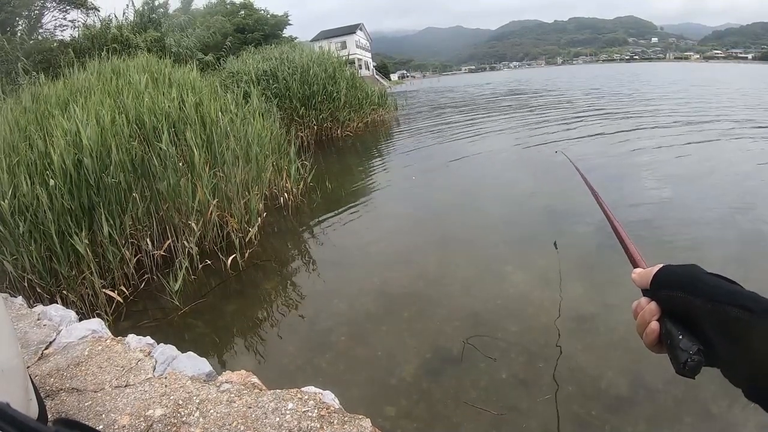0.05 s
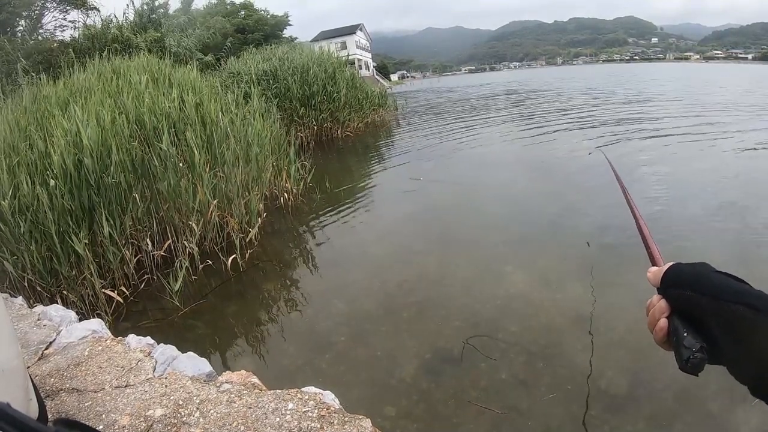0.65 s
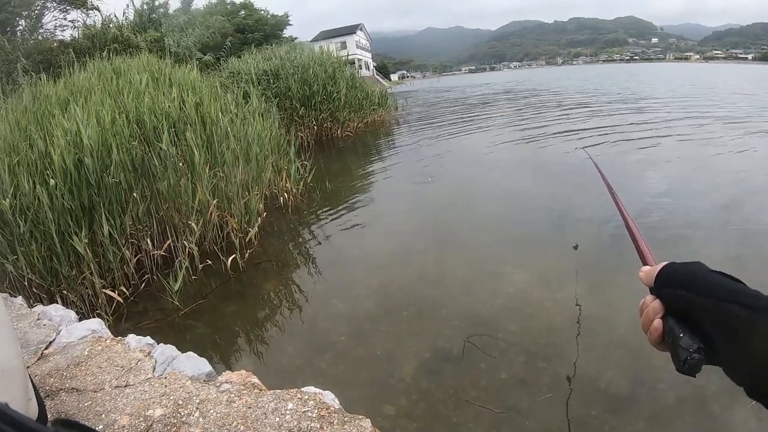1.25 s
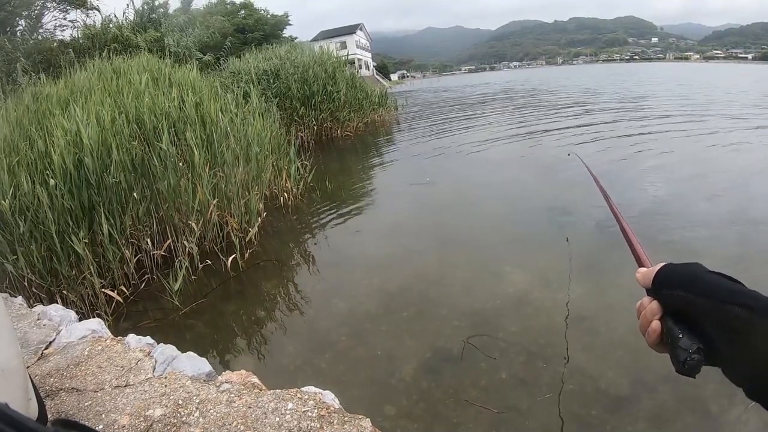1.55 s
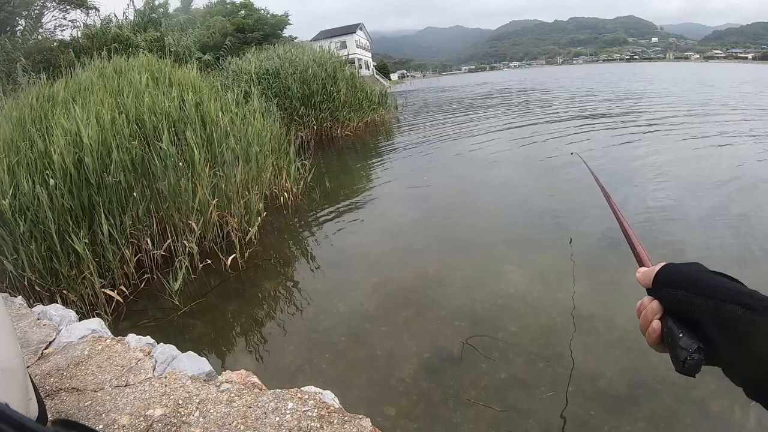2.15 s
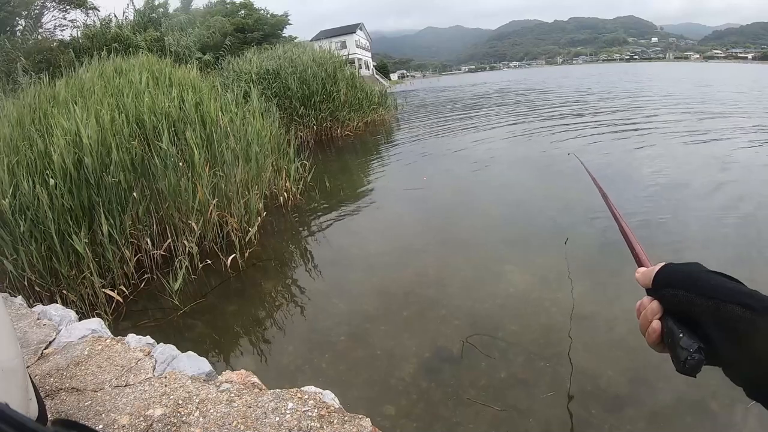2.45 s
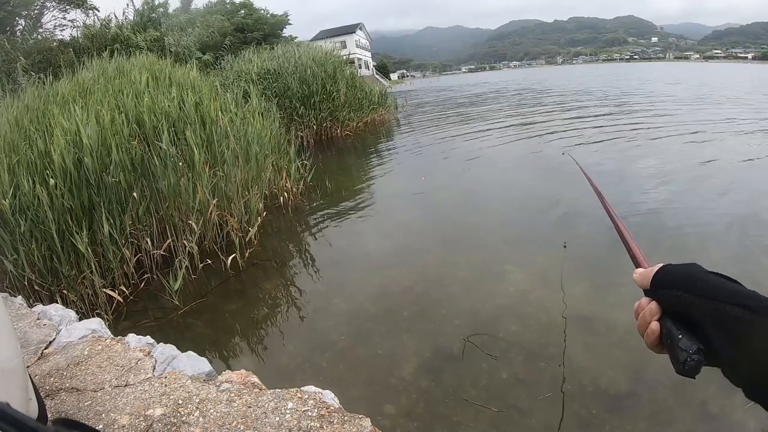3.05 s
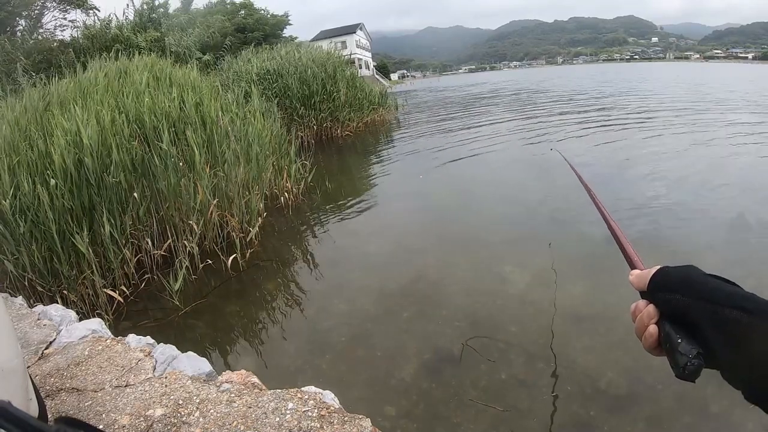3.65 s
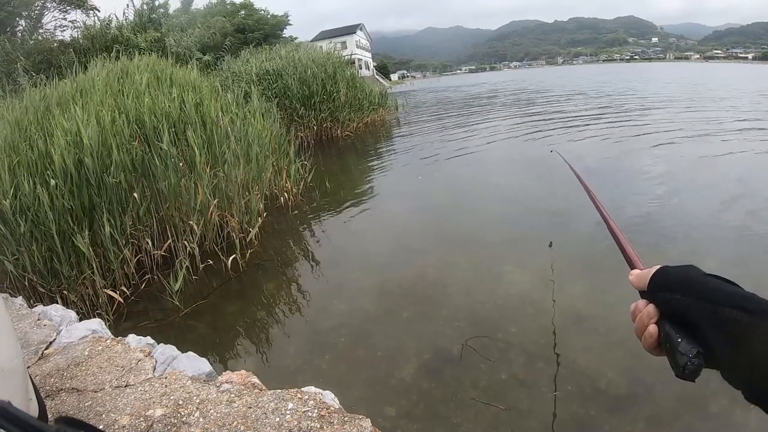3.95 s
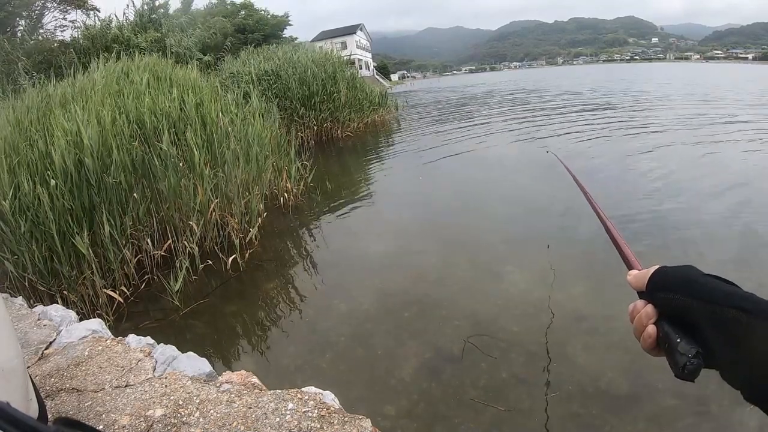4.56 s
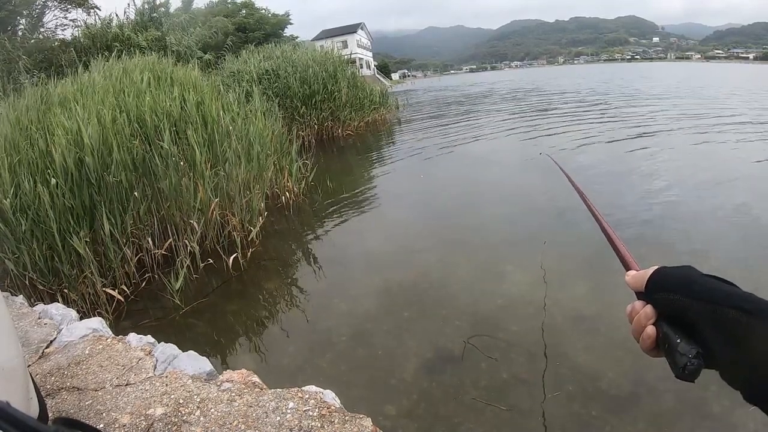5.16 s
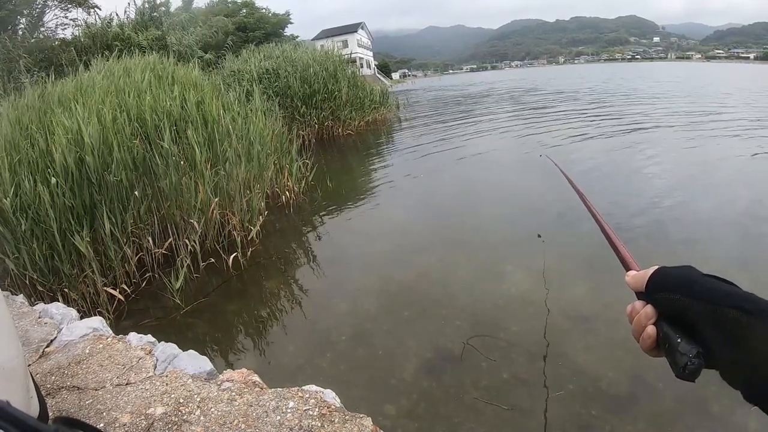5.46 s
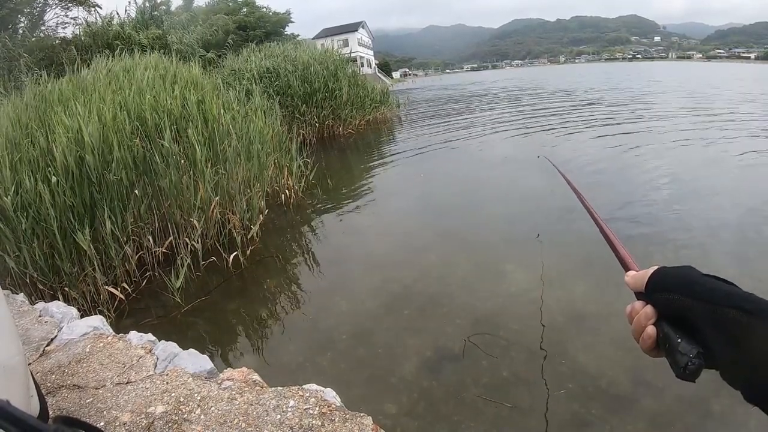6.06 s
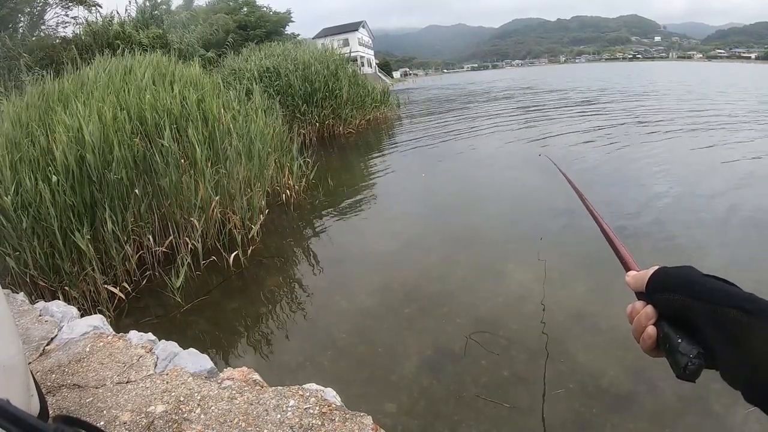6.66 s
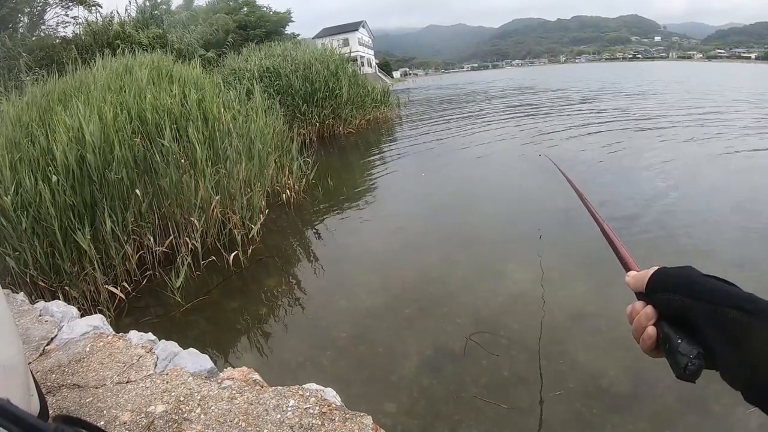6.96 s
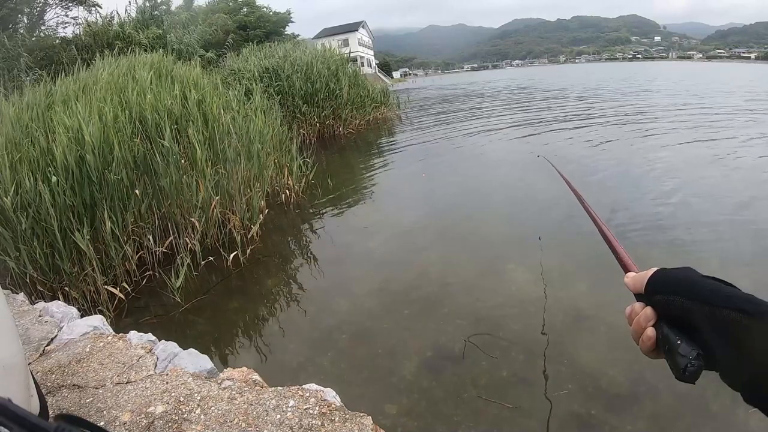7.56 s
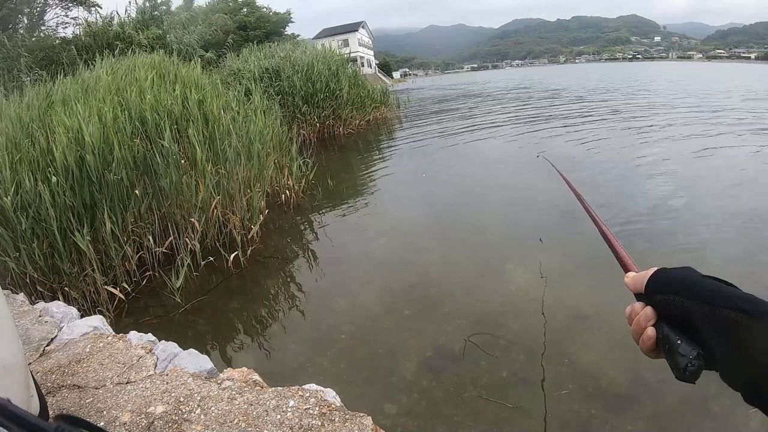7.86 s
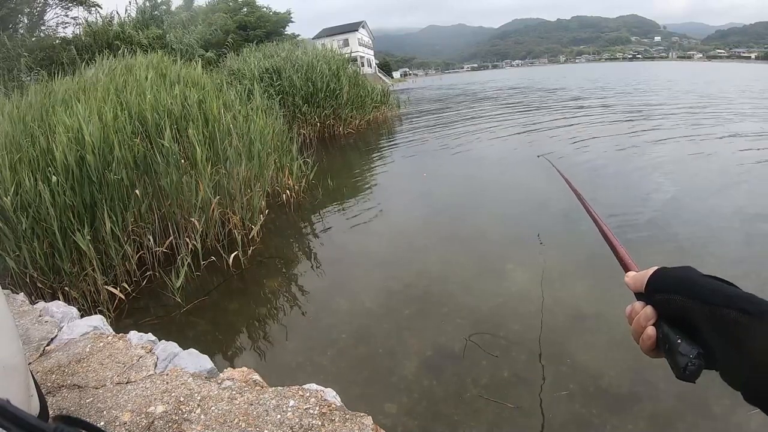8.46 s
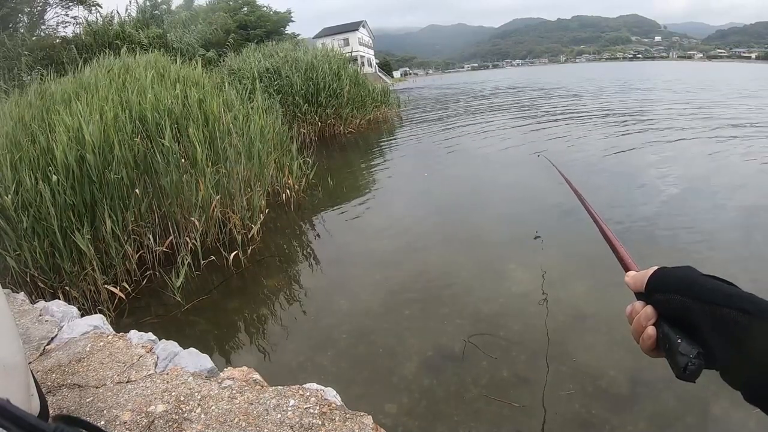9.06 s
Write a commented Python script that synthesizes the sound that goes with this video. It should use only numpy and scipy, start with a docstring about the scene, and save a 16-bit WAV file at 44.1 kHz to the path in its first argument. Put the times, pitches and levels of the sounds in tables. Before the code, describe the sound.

A distant engine drones across a lake with a low, wavering hum and a dull roar. It swells about three seconds in, sinks a little in pitch, then slowly fades. A breeze hisses evenly in the reeds, with faint rustles and ticks from the stalks. In the second half, small drips plop at the water's edge, and light gusts buffet the body-worn microphone near the end.

```python
"""A distant engine drones across a lake, its firing hum wavering over the water inside a dull roar.
A breeze hisses in the reeds; a thin machine whine and a faint insect buzz die away early, while
leaves brush and stalks tick. Near 3 s the engine swells with a hollow growl, sinking a little in pitch,
then slowly fades. From about 5.7 s clear drips plop at the water's edge, each a ringing bubble.
Light gusts, barely there at first, buffet the two ports of a body-worn camera near the end."""
import sys
import numpy as np
from scipy import signal
from scipy.fft import rfft, irfft, next_fast_len
from scipy.io import wavfile
from scipy.ndimage import uniform_filter1d

SR = 44100
rng = np.random.default_rng(int(sys.argv[2]) if len(sys.argv) > 2 else 0)


def file_out(sig):
    """Save sig as 16-bit WAV at sys.argv[1]."""
    # one column per channel
    cols = np.atleast_2d(sig).T
    # limit, then scale
    lim = np.clip(cols, -1, 1)
    pcm = np.round(lim * 32767).astype(np.int16)
    wavfile.write(sys.argv[1], SR, pcm)


N = 410571
TIME = np.arange(N) / SR

# how well the engine's drone, roar and whirr reach the shore: (time [s], relative level [dB])
PASSAGE = [(0.05, -43.5), (.4, -44), (1.2, -44), (1.6, -44), (2.1, -43.5), (2.66, -40), (2.98, -46.5),
           (3.38, -44.5), (3.65, -47), (5.25, -49), (6.3, -56), (7.33, -60), (9.25, -65)]


def gain_of(db):
    """Decibels to amplitude."""
    return 10 ** (np.asarray(db) / 20)


def unit_rms(x):
    """Scales to rms 1."""
    return x / np.sqrt(np.mean(x ** 2) + 1e-20)


def curve(rows, axis=1):
    """Joins one column of (time, value, ..) rows by straight lines."""
    columns = np.transpose(rows)
    return np.interp(TIME, columns[0], columns[axis])


def below_peak(rows):
    """A level curve in dB, with its loudest moment at 0."""
    level_db = curve(rows)
    return level_db - level_db.max()


def at_hz(rows, hz, axis=1):
    """Reads one column of a table on a log-frequency axis."""
    columns = np.transpose(rows)
    return np.interp(np.log(hz + 1), np.log(columns[0] + 1), columns[axis])


def wander(rate_hz):
    """Random drift of rms 1, with little motion faster than the rate."""
    size = next_fast_len(N)
    hz = np.fft.rfftfreq(size, 1 / SR)
    spectrum = rfft(rng.standard_normal(size)) * np.exp(-.5 * (hz / rate_hz) ** 2)
    return unit_rms(irfft(spectrum, size)[:N])


def swell(s, length):
    """A smooth rise and fall around a moment."""
    return np.cos(np.pi * np.clip((TIME - s) / length, -.5, .5)) ** 2


def surges(rows):
    """Passing lifts and dips in level, in dB."""
    return sum(lift_db * swell(s, length) for s, length, lift_db in rows)


def add(mix, s, sound):
    """Mixes a two-channel sound in at a moment."""
    part = mix[:, max(round(s * SR), 0):][:, :sound.shape[1]]
    part += sound[:, :part.shape[1]]


def noise(colour, patchy_db, flicker_db):
    """Coloured noise with drifting patches and quick flicker, as the two ports pick it up."""
    # the port pair: (frequency [Hz], coherence, left phase lead [rad], left minus right [dB])
    ports = [(130, 0.96, 0.059, -0.7), (354, 0.97, 0.081, -1.6), (630, 1, 1.1, -1.5), (709, 0.87, 1.27, -2),
             (874, 0.89, 3.35, 1), (1160, 0.75, 6.63, 1), (1480, 0.76, 7.65, 5.5), (1830, 0.074, 5.9, 10.5),
             (2270, 0.22, 5.4, 4.5), (3040, 0.69, 5.93, -1), (3330, 1, 6.5, 0.7), (5600, 0.17, 8.3, -1.5),
             (7840, 0.43, 9.1, -2.5), (8800, 0.14, 9.4, -1.5)]
    frames, hz = N // 512 + 5, np.fft.rfftfreq(2048, 1 / SR)
    a, b, c, d, patches = rng.standard_normal((5, frames, 1025))
    patches = uniform_filter1d(patches, size=7, axis=0)
    patches = unit_rms(uniform_filter1d(patches, size=24, axis=1))
    coherence = np.clip(at_hz(ports, hz), 0, 1)
    left = a + 1j * b
    right = coherence * left + np.sqrt(1 - coherence ** 2) * (c + 1j * d)
    right *= np.exp(-1j * at_hz(ports, hz, axis=2))
    lean = gain_of(at_hz(ports, hz, axis=3))
    spectra = np.array([left * lean, right]) / np.sqrt(1 + lean ** 2)
    spectra *= gain_of(at_hz(colour, hz) + patchy_db * patches)
    sound = signal.istft(np.swapaxes(spectra, 1, 2), nperseg=2048, noverlap=1536)[1][:, :N]
    return unit_rms(sound * gain_of(flicker_db * wander(44)))


def from_bearing(sound, lift_db):
    """The camera body favours one port near 850 Hz, by an amount that depends on direction."""
    band = signal.sosfiltfilt(signal.butter(1, [730, 1000], "band", fs=SR, output="sos"), sound)
    return sound + band * (gain_of(lift_db * np.array([[1], [-.5]])) - 1)


def partial(turns, rough, width_hz):
    """A direct tone plus scattered paths that blur its level and phase."""
    scatter = (wander(width_hz) + 1j * wander(width_hz)) / np.sqrt(2)
    paths = np.sqrt(1 - rough ** 2) + rough * scatter
    return np.sqrt(2) * (paths * np.exp(2j * np.pi * turns)).real


def burst(low_hz, high_hz, decay_s, order):
    """A brief puff of noise in a band, nearly alike at both ports."""
    t = np.arange(SR // 8) / SR
    hiss = rng.standard_normal(len(t)) + .5 * rng.standard_normal((2, len(t)))
    band = signal.butter(order, [low_hz, high_hz], "band", fs=SR, output="sos")
    return unit_rms(signal.sosfilt(band, hiss)) * np.exp(-t / decay_s) * (1 - np.exp(-t / 0.0017))


def engine_tones(hum_trim_db=-0.9, waver_db=0.85, drone_order=2.185):
    """A wavering firing hum, a throb an octave below and a higher drone all ride one engine speed."""
    # the engine's firing: (time [s], rate [Hz])
    firing_rate = [(0, 133.3), (.6, 130), (1.05, 127.6), (2, 125.9), (2.6, 124.5), (2.9, 122), (3.3, 122.8),
                   (3.8, 120.4), (4.7, 120), (5.1, 119.6), (5.7, 121.6), (8.7, 122.1), (9.31, 124.7)]
    # the firing tone as it arrives over the water: (time [s], relative level [dB])
    hum_levels = [(0.0, -66), (0.3, -47), (0.48, -41.5), (0.78, -43), (0.88, -35.5), (0.96, -45),
                  (1.04, -36), (1.3, -35), (1.45, -39.5), (1.68, -33.5), (2.25, -31.5), (2.33, -37.5),
                  (2.52, -32), (3.06, -36), (3.28, -27.5), (3.52, -31), (3.77, -39.5), (3.9, -31.5),
                  (4.76, -35.5), (4.95, -47.5), (5.48, -43), (5.6, -32.5), (5.72, -34), (5.81, -52.5),
                  (5.9, -38.5), (6.03, -32), (6.36, -38.5), (6.46, -36.5), (6.65, -39.5), (6.88, -39.5),
                  (7.1, -34), (7.31, -39.5), (7.43, -36.5), (7.66, -33.5), (7.89, -47.5), (8.02, -34),
                  (8.3, -37), (8.56, -42), (8.76, -70), (8.92, -63), (9.02, -45), (9.3, -49.5)]
    # the half order, from uneven firing: (time [s], level [dB])
    throb_levels = [(0, -66), (.3, -43.5), (.58, -37.5), (.76, -48), (1.35, -41.5), (1.7, -50.5),
                    (2.2, -46.5), (3.2, -49), (4.2, -45.5), (5.1, -52), (5.8, -44), (6.4, -48.5),
                    (7.6, -50), (8.4, -61), (9.3, -72)]
    # moments when the drone carries better or worse: (time [s], length [s], lift [dB])
    drone_surges = [(.05, 0.63, -11.5), (0.775, 0.28, 9.5), (1.37, 0.16, 9), (1.827, 0.18, 8),
                    (2.25, 0.22, 4), (3.3, 0.55, 3), (5.377, 0.46, 5.5), (6.097, .35, 6), (6.62, .3, 5),
                    (8.023, 0.55, 15)]
    turns = np.cumsum(curve(firing_rate)) / SR
    hum_db = curve(hum_levels) + hum_trim_db + waver_db * wander(rate_hz=3.3)
    drone_db = -42 + 0.95 * below_peak(PASSAGE) + surges(drone_surges)
    hum = gain_of(hum_db) * partial(turns, rough=0.19, width_hz=16)
    throb = gain_of(curve(throb_levels)) * partial(turns / 2, rough=0.75, width_hz=8.2)
    drone = gain_of(drone_db) * partial(drone_order * turns, rough=0.79, width_hz=13.8)
    return hum + throb + drone


def whine():
    """A thin machine whine that arches in pitch and fades early."""
    # the whine's arch: (time [s], pitch [Hz], level [dB])
    arch = [(0, 572, -63), (.25, 568, -55), (.7, 588, -52), (.95, 578, -50), (1.35, 568, -54.5),
            (1.65, 565, -70), (2.2, 560, -100)]
    turns = np.cumsum(curve(arch)) / SR
    return gain_of(curve(arch, axis=2)) * partial(turns, rough=0.83, width_hz=19)


def roar():
    """The engine's dull, rough noise, sinking as it leaves."""
    # the roar's colour: (frequency [Hz], relative level [dB])
    colour = [(30, -25.5), (95, 0.5), (150, 0.5), (230, -6.5), (295, -1.5), (350, -10.5), (460, -13.5),
              (590, -8), (900, -16.5), (1250, -21.5), (2200, -25.5), (4000, -37.5), (8000, -57.5),
              (14000, -79.5)]
    # moments when the roar carries better: (time [s], length [s], lift [dB])
    roar_surges = [(3.3, 0.82, 3), (5.7, 0.53, 2), (6.22, .6, 3.5)]
    level_db = -38.5 + 0.95 * below_peak(PASSAGE) + surges(roar_surges)
    return gain_of(level_db) * noise(colour, patchy_db=1.5, flicker_db=-0.33)


def whirr(abeam_s=4.1, rise_db_per_s=1, fall_db_per_s=0.5):
    """A nasal whirr, beamed sideways as the engine passes."""
    # one nasal peak: (frequency [Hz], relative level [dB])
    colour = [(300, -52), (850, -11.5), (1060, 3), (1250, 1.5), (1500, -13.5), (2500, -21.5), (8000, -63.5)]
    beam_db = np.minimum(rise_db_per_s * (TIME - abeam_s), fall_db_per_s * (abeam_s - TIME))
    level_db = -52.5 + 0.67 * below_peak(PASSAGE) + beam_db
    return gain_of(level_db) * noise(colour, patchy_db=2.0, flicker_db=1.5)


def shore():
    """An even wash whose treble brightens as the breeze freshens."""
    # breeze in the reeds over the shore's far rumble: (frequency [Hz], relative level [dB])
    colour = [(20, -16), (48, -1), (90, 0.5), (180, -3.5), (310, -6), (450, -20), (740, -18), (900, -23.5),
              (1500, -19), (2400, -26), (3500, -29.5), (5000, -38.5), (8400, -53.5), (10200, -52.5),
              (13500, -70.5)]
    # the breeze's strength: (time [s], treble lift [dB])
    breeze = [(0, -1.5), (1.6, 1), (3.6, 2), (5, -1.5), (6.9, 0.5), (7.4, 2.2), (9.31, 1.5)]
    wash = gain_of(-43.0) * from_bearing(noise(colour, patchy_db=1.0, flicker_db=.5), lift_db=-1.0)
    treble = signal.sosfiltfilt(signal.butter(2, 5000, "high", fs=SR, output="sos"), wash)
    return wash + treble * (gain_of(curve(breeze)) - 1)


def insect(pitch_hz=6330):
    """A faint, grainy, thin buzz from the reeds that soon stops."""
    buzz = partial(pitch_hz * TIME, rough=1, width_hz=150) * gain_of(3 * wander(40))
    level_db = curve([(0, -89), (.36, -80), (.46, -100), (.7, -140)])
    return gain_of(level_db) * buzz * gain_of([[1.5], [-1.5]])


def rustles(rise_s=0.028, fall_s=0.068, lift_db=7.5):
    """Leaf strokes leaf: a hiss swells and trails off, and dry edges add a bright scrape."""
    # reeds brushing each other: (time [s], relative level [dB], scrape lift [dB])
    strokes = [(.3, -65.5, -20), (.46, -65.5, -14), (.985, -73, 7), (1.345, -64, -2), (1.412, -63.5, 2),
               (1.68, -66, -9), (2.01, -63.5, -1), (2.65, -68.5, 3), (2.97, -71, 6), (3.39, -69, -9),
               (3.62, -68, -6), (3.86, -70, -1), (4.69, -69, 0)]
    # the leaves' hiss: (frequency [Hz], relative level [dB])
    colour = [(500, -23.5), (2300, 6.5), (3700, 2), (6000, -14), (10300, -19), (11500, -25), (14000, -34)]
    hiss = noise(colour, patchy_db=1.5, flicker_db=1.0)
    hiss = unit_rms(hiss * gain_of(2.5 * wander(300)))  # grainy as the edges slip
    scrape = signal.sosfiltfilt(signal.butter(3, 5500, "high", fs=SR, output="sos"), hiss)
    out = np.zeros((2, N))
    for s, db, scrape_db in strokes:
        from_peak = np.maximum((s - TIME) / rise_s, (TIME - s) / fall_s)
        envelope = np.exp(-np.minimum(from_peak, 10) ** 2)
        out += gain_of(db + lift_db) * envelope * (hiss + (gain_of(scrape_db) - 1) * scrape)
    return out


def ticks(faint_count=170, snap_s=.567, snap_hz=11000):
    """Reed stalks tick, each a narrow resonance plus a broader crack; one tiny snap is far brighter."""
    # the clearest stalk ticks: (time [s], relative level [dB], pitch [Hz])
    clear = [(3.40, -56, 3940), (3.61, -50.5, 3600), (4.929, -50, 3470), (5.558, -50.5, 3060),
             (5.657, -55.5, 3600), (6.85, -54, 3400), (7.088, -58, 3583), (7.593, -53, 3300),
             (8.042, -56, 3120), (8.155, -59, 3200), (8.245, -59, 3500), (8.43, -52, 3300),
             (8.585, -59, 3550), (8.877, -56, 3360)]
    faint = [(when * N / SR, -65 + 7 * force, 3700 - 2200 * dullness ** 2)
             for when, force, dullness in rng.random((faint_count, 3))]
    out = np.zeros((2, N))
    for s, db, hz in clear + faint:
        ring = burst(hz * .87, hz * 1.08, decay_s=.007, order=2)
        crack = burst(hz * .6, hz * 1.2, decay_s=.006, order=4)
        add(out, s, gain_of(db) * (gain_of(4) * ring + gain_of(-1.5) * crack))
    add(out, snap_s, gain_of(-71) * burst(snap_hz * 0.78, snap_hz * 1.15, decay_s=.003, order=2))
    return out


def growl(peak_s=3.42, rise_db_per_s=15, fall_db_per_s=48):
    """A hollow growl that builds as the engine comes abeam and drops away quickly."""
    # two low humps with a hollow between: (frequency [Hz], relative level [dB])
    colour = [(110, -29), (195, 2), (280, 3), (380, -16.5), (620, -8.5), (800, -17), (2000, -58)]
    level_db = -40.5 + np.minimum(rise_db_per_s * (TIME - peak_s), fall_db_per_s * (peak_s - TIME))
    return gain_of(level_db) * noise(colour, patchy_db=4.0, flicker_db=2.5)


def gusts():
    """Soft low buffets of wind, partly different at each port and stronger on the right."""
    # gusts on the microphone: (time [s], length [s], relative level [dB])
    buffets = [(3.7, .9, -58), (7.96, 0.43, -41), (8.538, 0.3, -39.5)]
    eddies = rng.standard_normal(N) + .95 * rng.standard_normal((2, N))
    rumble = unit_rms(signal.sosfilt(signal.butter(2, [30, 75], "band", fs=SR, output="sos"), eddies))
    envelope = sum(gain_of(db) * swell(s, length) for s, length, db in buffets)
    return rumble * envelope * gain_of([[-3], [2.5]])


def bubble(hz, decay_cycles=3.8):
    """A bubble rings for a few cycles and rises in pitch."""
    t = np.arange(SR // 8) / SR
    chirp = np.sin(2 * np.pi * hz * t * (1 + 4 * t))
    return chirp * np.exp(-t * hz / decay_cycles) * (1 - np.exp(-t / 0.00031))


def drips(faint_count=90, shed_count=3, shed_within_s=0.064):
    """Water laps: each clear plop has a crisp splash and sheds bubbles; faint ones fall throughout."""
    # the clearest drips at the water's edge: (time [s], level [dB], pitch [Hz])
    plops = [(5.665, -48, 900), (5.748, -46, 680), (5.782, -42, 1450), (5.797, -46, 600),
             (5.806, -41, 1100), (5.812, -44, 980), (5.835, -53, 700), (5.859, -51, 1280),
             (6.079, -36.5, 630), (6.197, -41.5, 2080), (6.259, -45, 2000), (6.502, -42, 1010),
             (6.594, -39, 1465), (6.812, -47, 1080), (6.837, -43, 640), (6.953, -46, 700),
             (6.984, -46, 600), (7.015, -37, 1630), (7.030, -47, 1150), (7.277, -42, 680),
             (7.599, -46, 615), (7.873, -43, 1250), (7.875, -44, 676), (7.907, -45, 1290),
             (8.500, -45, 1130), (8.502, -44.5, 577), (8.508, -44, 1400), (9.164, -47, 695),
             (9.254, -46, 589), (9.284, -48, 710)]
    out = np.zeros((2, N))
    for when, pitch, depth, side in rng.random((faint_count, 4)):
        lean_db = 4 * (side - .5) * np.array([[1], [-1]])
        level_db = -46.5 - 5 * pitch - 6.9 * depth + lean_db
        add(out, when * N / SR, gain_of(level_db) * bubble(560 + 1900 * pitch ** 2))
    for s, db, hz in plops:
        port_gains = gain_of(db + np.array([[1], [-1]]))
        splash = gain_of(-10.5) * burst(hz * 0.7, hz * 1.56, decay_s=0.0034, order=2)
        add(out, s, port_gains * (bubble(hz) + splash))
        for late, pitch in rng.random((shed_count, 2)):
            shed = gain_of(-14) * bubble(hz * 2 ** (.7 * pitch - .5))
            add(out, s + shed_within_s * late, port_gains * shed)
    return out


def scene(cross_s=3.3, cross_ease_s=1.4, start_lift_db=7, end_lift_db=-0.5):
    """The engine drifts from the left to about the centre behind the sounds of the shore, as the left port's
    lead near 850 Hz evens out."""
    tones = (engine_tones() + whine()) * gain_of([[-.45], [.45]])
    crossed = .5 + .5 * np.tanh((TIME - cross_s) / cross_ease_s)
    left_lift_db = start_lift_db + (end_lift_db - start_lift_db) * crossed
    engine = tones + from_bearing(roar() + whirr() + growl(), left_lift_db)
    return engine + shore() + gusts() + rustles() + ticks() + drips() + insect()


def record(dry):
    """The recorder's band limit rolls off the top at 13.5 kHz."""
    lowpass = signal.firwin(511, 13500, window=("kaiser", 9), fs=SR)
    return signal.oaconvolve(dry, lowpass[None], "same")


dry = scene()
out = record(dry)
file_out(out)
```